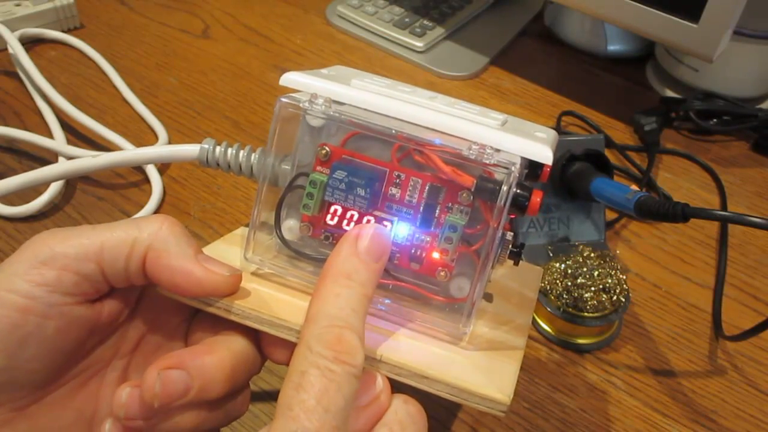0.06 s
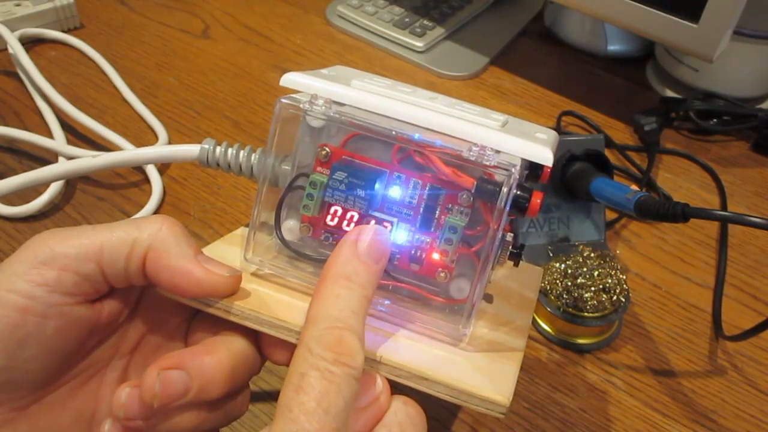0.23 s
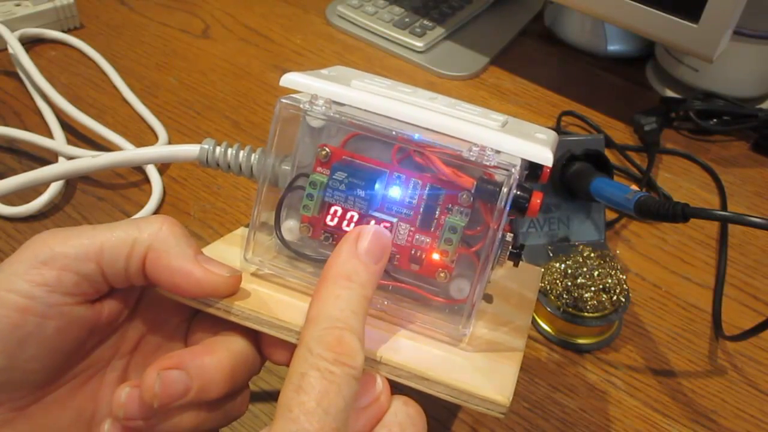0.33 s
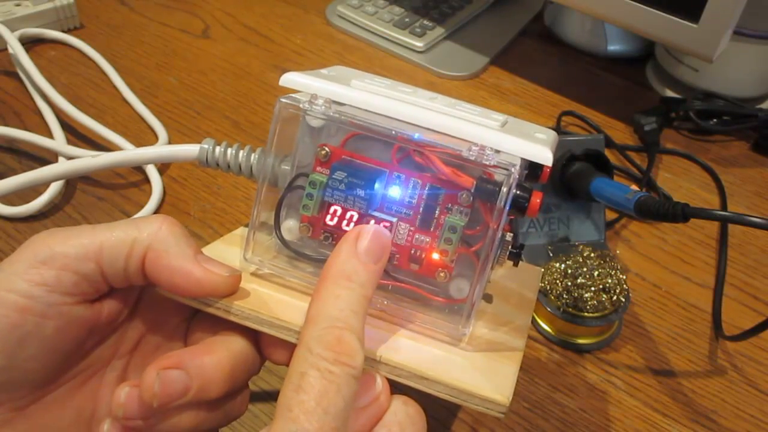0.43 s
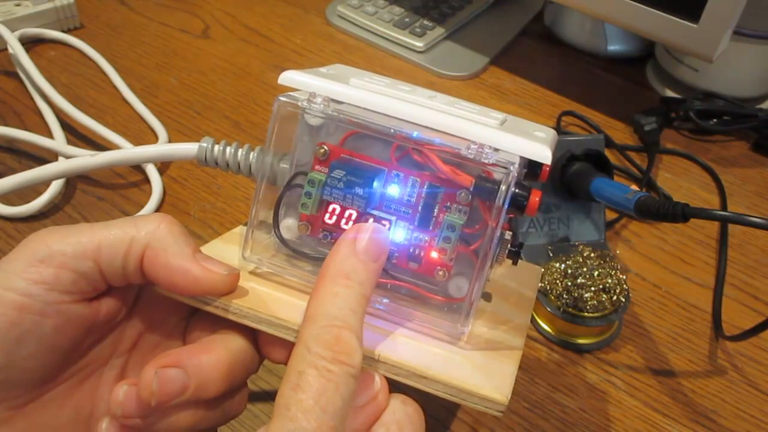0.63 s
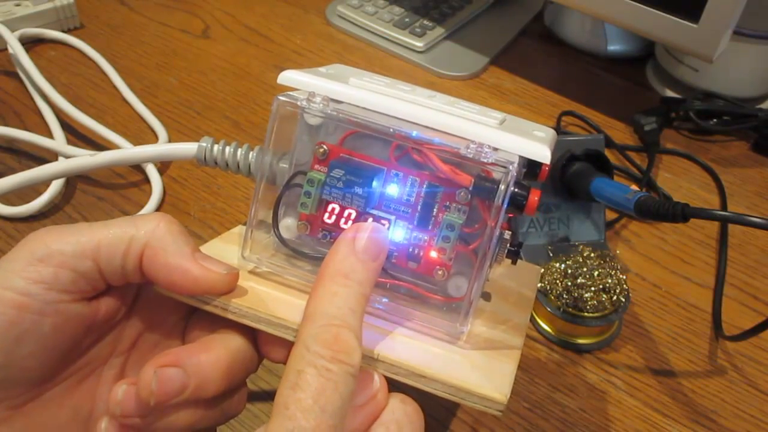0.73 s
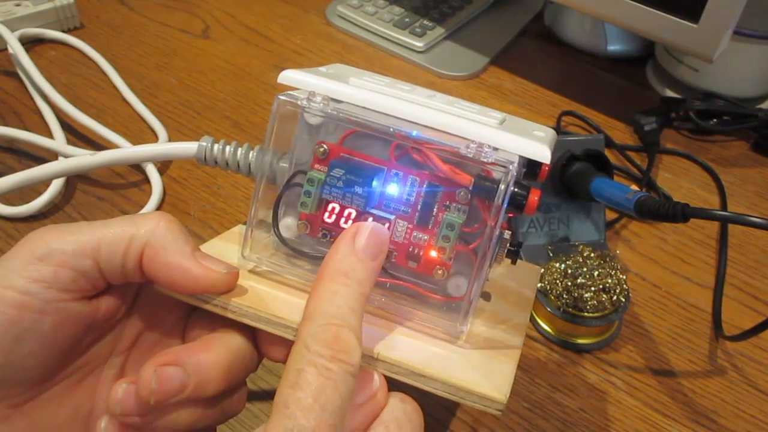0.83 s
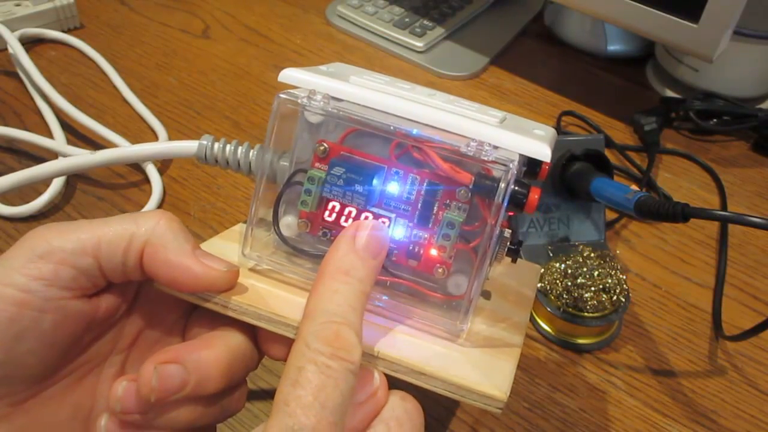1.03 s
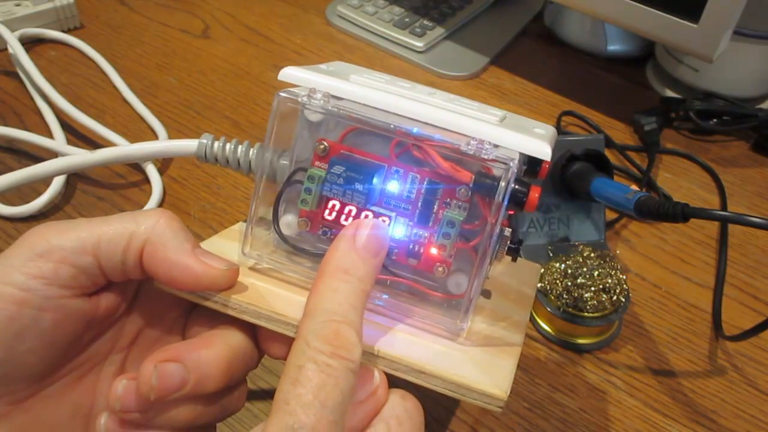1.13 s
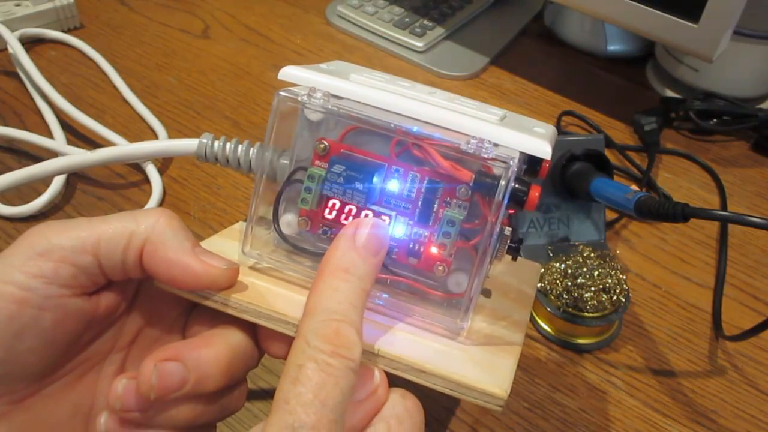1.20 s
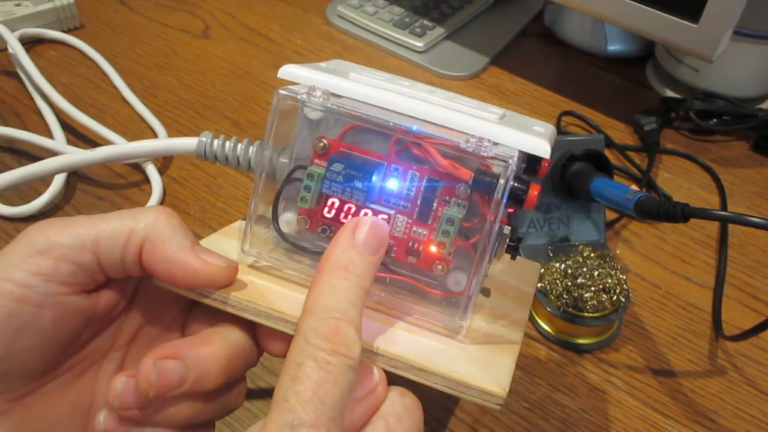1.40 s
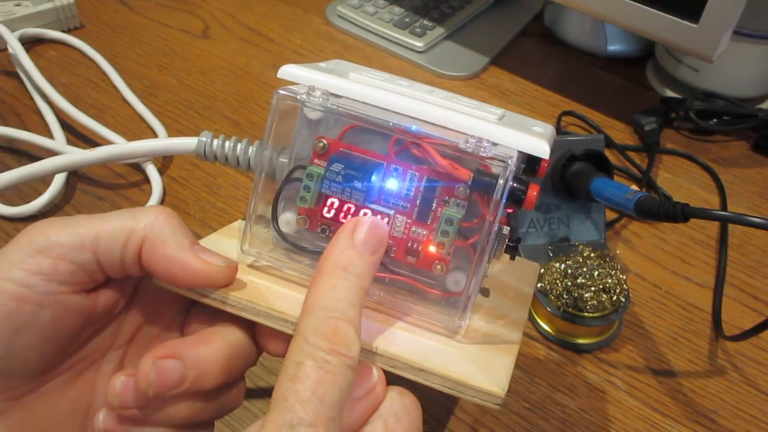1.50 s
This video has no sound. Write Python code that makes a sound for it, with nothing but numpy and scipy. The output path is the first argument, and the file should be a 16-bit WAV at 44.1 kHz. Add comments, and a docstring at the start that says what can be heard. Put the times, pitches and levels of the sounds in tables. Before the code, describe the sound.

A small relay in a plastic box clicks once, sharp and very close, with a tiny bounce and brief small-room echo; a faint low mains hum, fan tones and soft hiss run throughout in stereo.

```python
"""A desk in a small room: a small relay in a plastic box snaps shut once, close to a camera's stereo microphones.
The armature hits and bounces; each blow is a short push that rings decaying modes of relay and box.
The desk returns one reflection to each microphone, and the room answers briefly with decaying noise.
Behind it lie a mains hum, a few wavering fan tones of slowly modulated sines, and a soft room hiss
of coloured noise."""
import sys
import numpy as np
from scipy import signal
from scipy.fft import rfft, irfft, next_fast_len
from scipy.io import wavfile
from scipy.ndimage import uniform_filter1d

SR = 44100
rng = np.random.default_rng(int(sys.argv[2]) if len(sys.argv) > 2 else 0)


def waveform_to_disk(signal):
    """Save audio, clipped to [-1, 1], as 16-bit WAV at the path in sys.argv[1]."""
    frames = np.transpose(np.atleast_2d(signal))
    scaled = np.clip(frames, -1, 1) * 32767
    samples = np.round(scaled).astype(np.int16)
    wavfile.write(sys.argv[1], SR, samples)


N = 68355
T = np.arange(N) / SR  # time [s]
LEFT_RIGHT = np.array([[1], [-1]])  # sign of an opposed signal at each microphone


def undb(db):
    """Gain of a dB value."""
    return 10 ** (np.asarray(db) / 20)


def curve(points, hz):
    """Read a (frequency [Hz], value) table on a log frequency axis."""
    p = np.array(points)
    return np.interp(np.log(np.maximum(hz, 1)), np.log(p[:, 0]), p[:, 1])


def half_octaves(x):
    """Split x into overlapping half-octave bands that add up to it again: (centre [Hz], band)."""
    size = next_fast_len(x.shape[-1])
    spectrum = rfft(x, size)
    hz = np.arange(size // 2 + 1) * SR / size
    place = 2 * np.log2(np.maximum(hz, 1))  # half octaves above 1 Hz
    for k in range(8, 28):
        weight = np.clip(1 - abs(place - k), 0, 1)
        yield 2 ** (k / 2), irfft(spectrum * weight, size)[..., :x.shape[-1]]


def colour(x, points):
    """Filter x with a (frequency [Hz], level [dB]) table."""
    size = next_fast_len(x.shape[-1])
    hz = np.arange(size // 2 + 1) * SR / size
    return irfft(rfft(x, size) * undb(curve(points, hz)), size)[..., :x.shape[-1]]


def walk(rate):
    """Random levels held for 1 / rate seconds, then smoothed twice over that time."""
    hold = int(SR / rate)
    steps = np.repeat(rng.standard_normal(N // hold + 1), hold)
    return uniform_filter1d(uniform_filter1d(steps, hold), hold)[:N]


HUM_HZ, HUM_DB = 120.2, -48.5  # level is rms
HUM_WAVER_DB = 1.5  # spread of the random levels before smoothing
HUM_PAN_DB = .15  # left minus right
# fan tones behind the relay:
# (frequency [Hz], rate of wavering [Hz], rms level [dB])
FAN_TONES = [(133.6, 6.17, -60), (228.6, 27, -58.5), (260.8, 13, -58.5), (300, 12.9, -58), (604, 23, -67.5)]


def hum():
    """A mains tone whose level wavers a little, with fan tones as sines of random amplitude and phase."""
    level_db = HUM_DB + LEFT_RIGHT * HUM_PAN_DB / 2 + HUM_WAVER_DB * walk(11.2)
    mains = np.sqrt(2) * np.sin(2 * np.pi * (HUM_HZ * T + rng.random()))
    out = undb(level_db) * mains
    for hz, rate_hz, db in FAN_TONES:
        angle = 2 * np.pi * hz * T
        tone = walk(rate_hz) * np.sin(angle) + walk(rate_hz) * np.cos(angle)
        out = out + undb(db) * tone / tone.std()
    return out


HISS_DB = -81.5  # per Hz, where the tables below read 0 dB
FLICKER_DB = 1.3  # spread of the random band levels before smoothing
# room hiss, part common to both microphones: (frequency [Hz], relative level [dB])
HISS_COMMON = [(20, -6.5), (45, 1.5), (90, 4), (150, 4), (200, 5), (330, 3), (700, -4), (1200, -6.5),
               (3000, -22), (4200, -26.5), (8000, -30), (9200, -34), (10200, -44.5)]
# room hiss, part opposed between the microphones: (frequency [Hz], relative level [dB])
HISS_OPPOSED = [(20, -31), (110, -38.5), (170, -27), (220, -14), (330, -2), (700, -8), (1200, -5.5),
                (3000, -24), (4200, -26.5), (8000, -31), (9200, -33.5), (10200, -47)]


def hiss():
    """Wide coloured noise whose bands flicker on their own; the bass is nearly alike left and right."""
    common, opposed = rng.standard_normal((2, N)) * np.sqrt(SR / 2) * undb(HISS_DB)
    both = colour(common, HISS_COMMON) + LEFT_RIGHT * colour(opposed, HISS_OPPOSED)
    return sum(band * undb(FLICKER_DB * walk(8.6)) for _, band in half_octaves(both))


# armature blows, a longer contact sounding duller:
# (time [s], relative level [dB], contact time [ms])
ARMATURE_BLOWS = [(.22057, -8.1, .113), (.22231, -27, .03), (.2292, -8.5, .75)]


def contact(late_ms):
    """Force on the relay as it arrives late_ms later: each blow is a short smooth push."""
    force = 0
    for s, db, ms in ARMATURE_BLOWS:
        # the contact time spans four standard deviations of the bell
        push = np.exp(-.5 * ((T - s - late_ms / 1000) * 4000 / ms) ** 2)
        force = force + undb(db) * push / (ms * SR / 2000)
    return force


BUILD_CYCLES = 1.74  # time constant of a mode's build-up
BOX_TOP_HZ, BOX_SLOW = 1300, 3  # box walls, below this, get going later: power of the build-up
RIGHT_LAG_MS = 0.015  # direct sound at the right microphone
# relay and box modes up close:
# (frequency [Hz], relative level [dB], decay by 60 dB [s], left minus right [dB])
RELAY_BOX_MODES = [(642, -22, 0.031, 3), (828, 1, 0.017, -2), (1120, -5.5, 0.017, -1),
                   (1530, -22.5, 0.064, 0), (2096, 5, 0.0061, 0), (2060, -24, 0.012, 3),
                   (2385, -11, 0.019, -7), (2733, -4.5, 0.02, 0), (3110, -15.5, 0.026, -2),
                   (3600, -12.5, 0.0081, -1), (4670, -7.5, 0.0098, -3.5), (5320, -15, 0.016, -3),
                   (6020, -16, 0.021, -2), (6820, -16, 0.0096, 5), (7870, -12.5, 0.021, 0),
                   (8510, -18.5, 0.03, 7), (9440, -10.5, 0.015, -1), (9860, -13, 0.032, -3),
                   (10530, -10, 0.01, 2.5), (5130, -47, .15, 0.5), (6110, -36, 0.14, -2)]
# desk reflection, one row each for the left and the right microphone:
# (delay [ms], level relative to the direct sound [dB])
DESK_REFLECTION = [(2.6, -22), (3.11, -11)]


def relay():
    """The force rings the modes, which build over a few cycles; alternate modes start in opposite sense."""
    t = T[:SR // 5]
    ring = 0
    for k, (hz, db, t60, pan_db) in enumerate(RELAY_BOX_MODES):
        sense = (-1) ** (k + 1)
        gain = undb(db + LEFT_RIGHT * pan_db / 2)
        build = (1 - np.exp(-t * hz / BUILD_CYCLES)) ** (BOX_SLOW if hz < BOX_TOP_HZ else 1)
        ring = ring + sense * gain * np.sin(2 * np.pi * hz * t) * 1000. ** (-t / t60) * build
    paths = [contact(lag_ms) + undb(db) * contact(desk_ms)
             for lag_ms, (desk_ms, db) in zip((0, RIGHT_LAG_MS), DESK_REFLECTION)]
    return signal.fftconvolve(np.array(paths), ring, axes=1)[:, :N]


ROOM_DB, ROOM_RISE_S = -18, 0.0039
# colour of the small room's answer: (frequency [Hz], relative level [dB])
ROOM_TONE = [(400, -12.5), (580, 3.5), (700, -4), (830, 8.5), (1150, -6), (1550, 4.5), (1900, -1),
             (2400, -1), (3300, -2), (3800, -8.5), (4250, -22), (4800, 0.5), (5300, -2.5), (5700, -14),
             (6100, -4.5), (6700, -24), (7200, -7.5), (8000, 0), (8900, -0.5), (10000, 4), (10800, -30)]
# opposed part of the answer: (frequency [Hz], level relative to the common part [dB])
ROOM_OPPOSED = [(500, -23), (1200, -18), (2500, -1.5), (5000, 1.5), (9000, 1)]
# decay of the answer: (frequency [Hz], decay by 60 dB [s])
ROOM_DECAY = [(500, 0.2), (1500, 0.24), (3000, 0.23), (4000, 0.19), (5200, 0.29), (7000, 0.11),
              (10000, 0.18)]


def room(force):
    """Dense echoes of the blows, as noise that builds in a few ms and dies band by band."""
    t = T[:SR // 2]
    common, opposed = rng.standard_normal((2, len(t)))
    echoes = colour(common + LEFT_RIGHT * colour(opposed, ROOM_OPPOSED), ROOM_TONE)
    tail = sum(band * 1000. ** (-t / curve(ROOM_DECAY, hz)) for hz, band in half_octaves(echoes))
    tail = tail * (1 - np.exp(-(t / ROOM_RISE_S) ** 2)) * undb(ROOM_DB)
    return signal.fftconvolve(force[None], tail)[:, :N]


def scene():
    """The click and its room, over hum and hiss throughout."""
    return relay() + room(contact(0)) + hum() + hiss()


TOP_HZ = 11020


def record(dry):
    """The camera cuts the top with a steep low-pass."""
    low_pass = signal.ellip(10, .2, 70, TOP_HZ, fs=SR, output="sos")  # ripple, stopband [dB]
    return signal.sosfilt(low_pass, dry)


dry = scene()
out = record(dry)
waveform_to_disk(out)
```